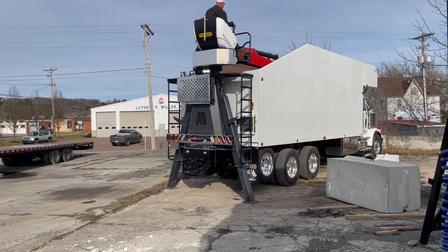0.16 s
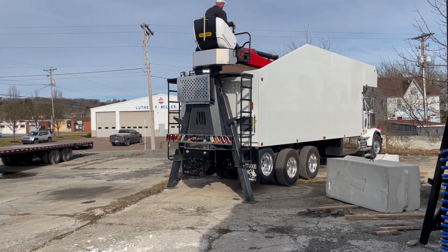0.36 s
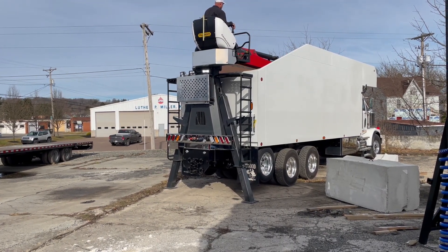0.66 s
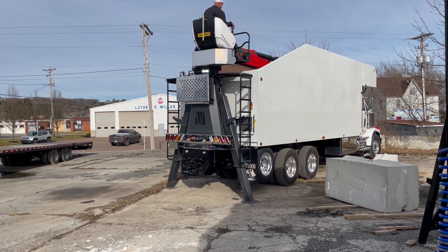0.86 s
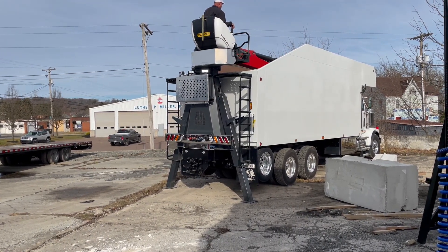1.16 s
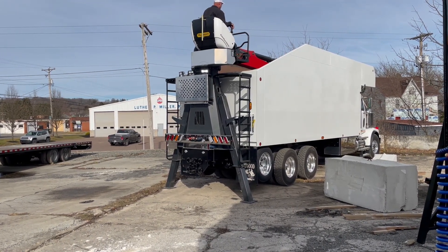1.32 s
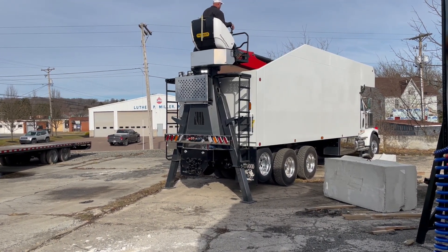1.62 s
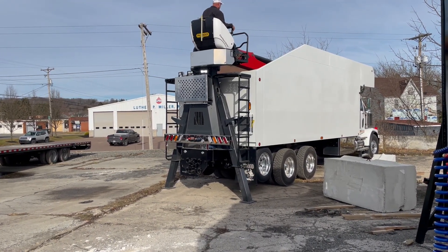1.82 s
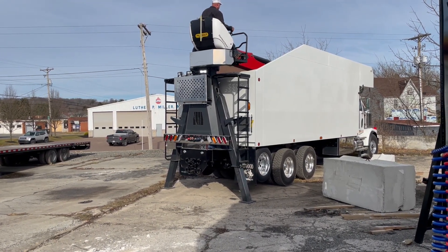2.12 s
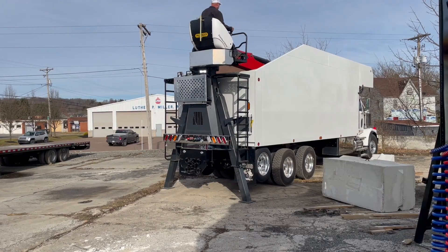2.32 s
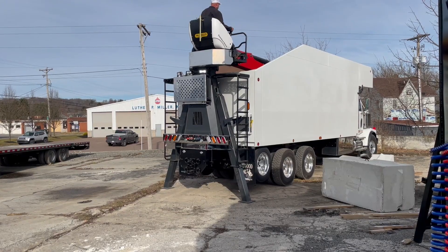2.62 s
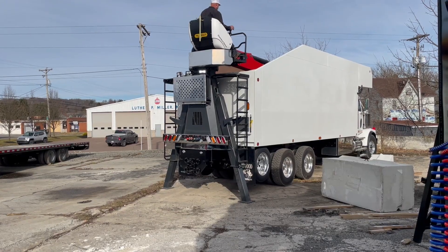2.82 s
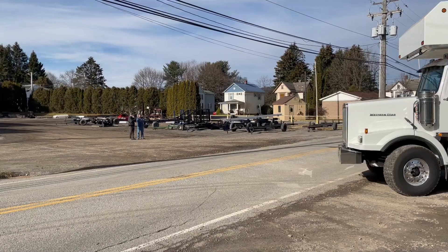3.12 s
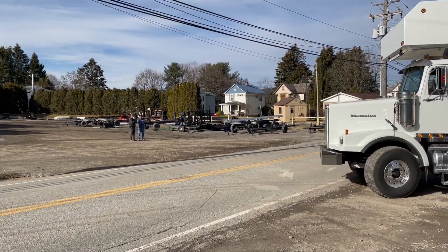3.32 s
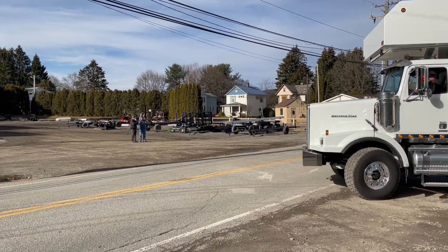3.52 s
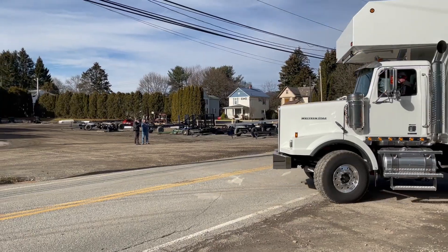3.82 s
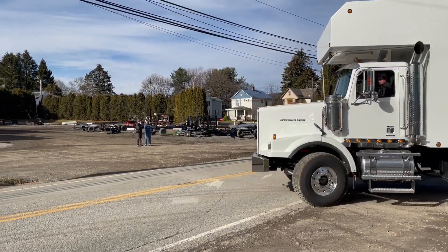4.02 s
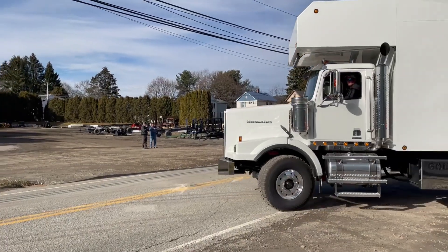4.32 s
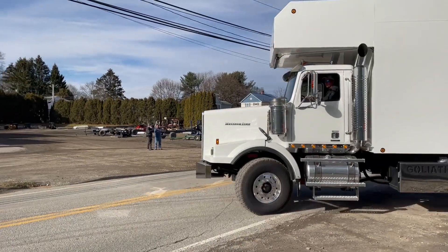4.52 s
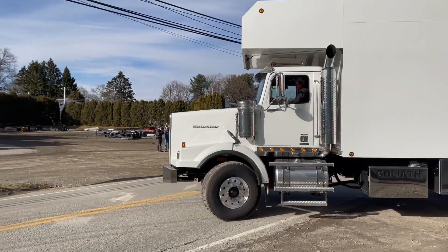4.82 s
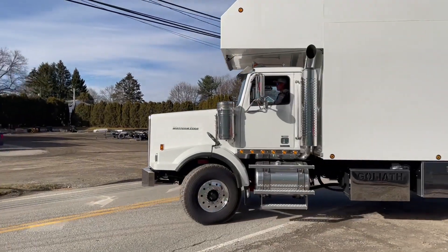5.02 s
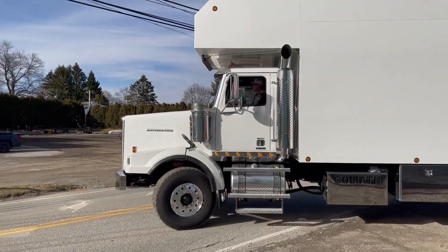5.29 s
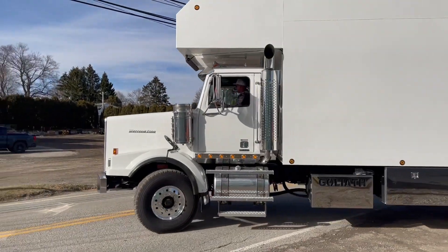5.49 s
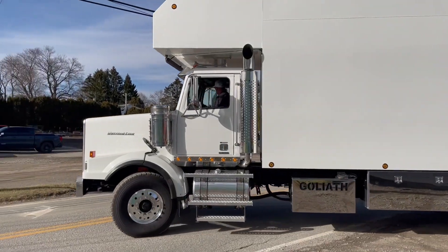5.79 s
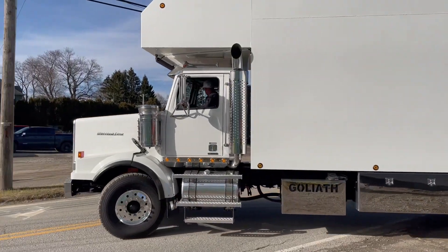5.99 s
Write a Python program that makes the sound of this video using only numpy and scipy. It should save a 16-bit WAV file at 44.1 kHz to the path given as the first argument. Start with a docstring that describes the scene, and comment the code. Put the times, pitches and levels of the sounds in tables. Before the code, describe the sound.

A diesel truck throbs at fast idle in a windy yard with pump whine, then abruptly another close view: it pulls away, shifts gear, turbo whistling.

```python
"""A six-cylinder diesel truck holds a fast idle in a windy yard, firings throbbing over a droning drive;
its crane pump whines at piston rate, oil hisses through a ringing valve, gusts of noise thump the microphone.
After a sudden cut the truck pulls out close by: brakes vent noise, revs climb under load, the turbo whistles.
At a gear change the throttle shuts, the revs drop and spare boost squeals out; then the truck pulls again.
Tones follow the firing and turbo rates; knocks and air are filtered noise, partly repeating by cylinder."""
import sys
import numpy as np
from scipy import signal
from scipy.fft import rfft, irfft
from scipy.io import wavfile
from scipy.ndimage import uniform_filter1d, map_coordinates

SR = 44100
rng = np.random.default_rng(int(sys.argv[2]) if len(sys.argv) > 2 else 0)


def dump_mix(stems):
    """Bounce the given channels to the path in sys.argv[1] as a 16-bit WAV at rate SR."""
    frames = np.atleast_2d(stems).T  # one column per channel
    limited = np.clip(frames, -1, 1)  # hard clip at full scale
    pcm = np.round(limited * 32767).astype(np.int16)
    wavfile.write(sys.argv[1], SR, pcm)


N = 271215
T = np.arange(N) / SR
FREQS = np.maximum(np.fft.rfftfreq(N, 1 / SR), 1)

YARD_END_S, ROAD_START_S = 3.081, 3.105
IDLE_HZ = 56.16  # firing rate at fast idle

# balance of opposite-phase to shared sound in the yard: (frequency [Hz], opposite minus shared [dB])
YARD_OPPOSITE = [(60, -13), (300, -3.5), (700, -7.5), (1300, -17.5), (2400, -4.5), (4800, -15),
                 (7800, 26.5), (10700, -23), (14000, 11)]
# balance of opposite-phase to shared sound on the road: (frequency [Hz], opposite minus shared [dB])
ROAD_OPPOSITE = [(60, -26), (250, -17), (500, -6.5), (1200, -10), (2500, -4.5), (5000, -9), (8400, 19),
                 (11000, -15.5)]
# revs driving off: (time [s], firing rate [Hz])
REVS = [(3.1, 69.37), (3.5, 80.07), (3.9, 87.21), (4.2, 90.33), (4.54, 91.3), (5.0, 74.98), (5.4, 64.06),
        (5.73, 59.38), (5.87, 62.67), (6.15, 65.14)]
# pulls on the throttle:
# (opens [s], shuts [s], throttle [0-1], throb before the muffler [dB], added combustion knock [dB])
PULLS = [(3.0, 4.51, 0.9, -11.5, 3.5), (5.737, 6.3, 0.21, -12, 5.5)]


def undb(db):
    """Decibels to gain."""
    return 10 ** (np.asarray(db) / 20)


def curves(table):
    """The columns of a table of timed rows, one value per sample."""
    s, *columns = np.transpose(table)
    return [np.interp(T, s, c) for c in columns]


def noise():
    """White noise of unit power."""
    return rng.standard_normal(N)


def walk(rate_hz):
    """Smooth random drift with a spread near 1."""
    k = int(SR / rate_hz)
    steps = np.repeat(rng.standard_normal(N // k + 1), k)
    return 1.3 * uniform_filter1d(uniform_filter1d(steps, k), k)[:N]


def after(start_s):
    """Seconds elapsed since a moment, zero before it."""
    return np.maximum(T - start_s, 0)


def gate(start_s, end_s, attack_s, release_s):
    """Envelope that rises from the start, holds at 1 and falls from the end."""
    rise = np.clip(after(start_s) / attack_s, 0, 1)
    return rise * np.clip(1 - after(end_s) / release_s, 0, 1)


def swell(centre_s, half_length_s):
    """A smooth rise and fall around a moment, 1 at its top."""
    return np.exp(-((T - centre_s) / half_length_s) ** 2 / 2)


def shape(points):
    """Gain at every frequency from (frequency [Hz], level [dB]) points."""
    hz, db = np.transpose(points)
    return undb(np.interp(np.log(FREQS), np.log(hz), db))


def bell(hz, centre_hz, width_hz):
    """Gain of one resonance, 1 at its centre."""
    return 1 / (1 + (2 * (hz - centre_hz) / width_hz) ** 2)


def lift(hz, modes):
    """Gain of a path that favours a few resonances."""
    return 1 + sum((undb(db) - 1) * bell(hz, f, w) for f, w, db in modes)


def filtered(x, gain):
    """Apply a gain at every frequency."""
    return irfft(rfft(x) * gain, N)


def colour(x, gain, band_hz=(0, SR)):
    """Filter white sound so that it has unit power inside the band."""
    inside = (FREQS >= band_hz[0]) & (FREQS <= band_hz[1])
    return filtered(x, gain / np.sqrt(np.mean(gain ** 2 * inside)))


def two_channels(source, balance):
    """Shared sound plus sound of opposite sign in the two channels, at constant power."""
    ratio = shape(balance)
    shared = 1 / np.sqrt(1 + ratio ** 2)
    signs = np.array([[1], [-1]])
    return filtered(source(), shared) + filtered(source(), ratio * shared) * signs


def count_cycles(hz):
    """Cycles elapsed at a moving rate."""
    return np.cumsum(hz) / SR


def tone(cycles):
    """A sine of unit power with a random start."""
    return np.sqrt(2) * np.sin(2 * np.pi * (cycles + rng.random()))


def breathy_tone(cycles, width_hz):
    """A whistle smeared by turbulence into a narrow moving band of unit power."""
    smear = bell(FREQS, 0, width_hz)
    angle = 2 * np.pi * cycles
    return colour(noise(), smear) * np.cos(angle) + colour(noise(), smear) * np.sin(angle)


def clatter(firings, repeat, knock, decay_s, uneven_db):
    """Six cylinders knock in turn, each with its own grain; part of each knock is fresh noise."""
    number = firings.astype(int)
    since = np.arange(N) - np.searchsorted(number, number)  # samples since the firing
    cylinder = number % 6
    voices = rng.standard_normal((6, 2048))
    repeat = np.clip(repeat, 0, 1)
    own = voices[cylinder, since % voices.shape[1]]
    grain = np.sqrt(repeat) * own + np.sqrt(1 - repeat) * noise()
    force = undb(uneven_db * rng.standard_normal(N)[number])
    x = grain * (1 + knock * force * np.exp(-since / SR / decay_s))
    return x / x.std()


def bass_swell():
    """Gain of the yard's low sounds, which start soft and soon reach full level."""
    start_db, settle_s = -15, 0.19
    return undb(start_db * np.exp(-T / settle_s))


def wind():
    """Light eddies flutter on each port alone; larger gusts thump both together, each duller or brighter."""
    # wind pressure spectrum: (frequency [Hz], relative density [dB per Hz])
    wind_spectrum = [(20, -17), (45, -11), (80, 5), (130, -3.5), (250, -5.5), (330, -17), (450, -22.5),
                     (1000, -31.5), (4000, -97)]
    # thumps: (time [s], level [dB], lowered by 4 dB for all thumps, half length [s], tilt [dB per octave])
    buffets = [(0.251, -14, 0.022, -3.5), (0.395, -14, 0.023, -4.5), (0.567, -10.5, 0.021, -2.5),
               (0.945, -9.5, 0.0084, -4), (1.06, -5.5, 0.019, -7), (1.192, -11, 0.0097, -4.5),
               (1.265, -12, 0.021, 7), (1.477, -18.5, 0.1, -1.5), (1.958, -10.5, 0.032, 0),
               (2.032, -10.5, 0.03, -1), (2.144, -12.5, 0.042, -3), (2.31, -14, 0.035, -3.5)]
    tilt_top_hz = 230  # gusts differ in colour below this
    eddies = [colour(noise(), shape(wind_spectrum)) * undb(-28.5 + 1.4 * walk(19)) for _ in range(2)]
    out = np.array(eddies) * bass_swell()
    turbulence = noise()
    for s, db, half_length_s, tilt_db in buffets:
        tilt = undb(tilt_db * np.log2(np.minimum(FREQS, tilt_top_hz)))
        pressure = colour(turbulence, shape(wind_spectrum) * tilt)
        pressure /= np.sqrt(uniform_filter1d(pressure ** 2, size=1500))  # the gust alone sets the strength
        out = out + undb(db - 4.0) * swell(s, half_length_s) * pressure
    return out


def governor():
    """How far the governor has raised the idle (0-1), and the firing rate [Hz] that results."""
    start_s, end_s, ramp_s, rise_hz = 1.0, 2.3, .1, .5
    raised = gate(start_s, end_s, ramp_s, ramp_s)
    return raised, IDLE_HZ + rise_hz * raised


def hydraulics():
    """The pump's pistons whine under load; oil hisses through the valve until the lever closes it."""
    # piston harmonics: (multiple of the piston rate [1], level re pump [dB])
    pump_orders = [(1, 1), (3, 0.5), (7, -12)]
    # oil flow spectrum: (frequency [Hz], relative density [dB per Hz])
    oil_spectrum = [(1500, 5.5), (4400, -2), (10500, 0), (12000, -5.5), (15700, -1)]
    # oil valve resonances: (frequency [Hz], width [Hz], lift [dB])
    valve_modes = [(4930, 230, 6.5), (6310, 240, 16), (8780, 240, 8), (10070, 150, 2)]
    # the pump labours at first, then speeds up and quietens as its load eases
    labouring_hz, labouring_db, eases_s = 694, -42, .76
    rise_hz, rise_s, drop_db, drop_s = 9, 0.095, 9, 0.22
    oil_db, valve_closes_s, fade_db_per_s = -44.5, 1.83, 13
    eased_s = after(eases_s)
    hz = labouring_hz + rise_hz * (1 - np.exp(-eased_s / rise_s))
    pump_db = labouring_db - drop_db * (1 - np.exp(-eased_s / drop_s))
    strokes = count_cycles(hz * (1 + 0.0011 * walk(25.24)))
    whine = sum(tone(k * strokes) * undb(pump_db + db + 1.3 * walk(18.2)) for k, db in pump_orders)
    # the engine drives the pump, so part of the hiss repeats with the firings
    firings = count_cycles(governor()[1])
    flow = two_channels(lambda: clatter(firings, repeat=0.1, knock=0.095, decay_s=0.0078, uneven_db=8.5),
                        YARD_OPPOSITE)
    hiss = colour(flow, shape(oil_spectrum) * lift(FREQS, valve_modes), (8500, 13000))
    return whine + hiss * undb(oil_db - fade_db_per_s * after(valve_closes_s))


def idling_engine():
    """Governed diesel heard from behind: exhaust strokes, a droning accessory drive, dull clatter."""
    # exhaust lines: (multiple of the firing rate [1])
    line_orders = [3, 5, 6, 9, 10]
    # their mean levels: (level [dB])
    line_levels_db = [-45.5, -46.5, -49.5, -55, -47.5]
    # accessory drive whirr: (multiple of the drive rate [1])
    drive_orders = [4, 5, 6, 7, 8, 10, 11, 14]
    # their mean levels: (level [dB])
    drive_levels_db = [-49.5, -49, -45.5, -43.5, -55, -46, -49, -53.5]
    # clatter through the block: (frequency [Hz], relative density [dB per Hz])
    block_spectrum = [(30, -17), (60, 16.5), (150, 10.5), (330, -2), (500, 2), (750, 2), (1000, -1),
                      (1500, -2.5), (2000, -6.5), (3000, -14), (4500, -19), (8000, -26), (12000, -48),
                      (15000, -50)]
    drive_hz = 108.84  # at IDLE_HZ; turns with the engine
    full_throb_db, hum_db, full_drone_db, clatter_db = -22.5, -26, -28.5, -32.5
    full_s, swell_db_per_s = 1.07, 37  # the throb swells as the crane takes the weight
    dip_s, dip_half_s, dip_db = 2.385, 0.016, -14  # the throb dips briefly
    drone_dip_db = -6  # the drone sinks while the governor runs faster
    raised, hz = governor()
    firings = count_cycles(hz * (1 + 0.002933 * walk(12)))
    throb_db = full_throb_db - swell_db_per_s * np.maximum(full_s - T, 0) + dip_db * swell(dip_s, dip_half_s)
    stroke = 2 * np.pi * firings  # throb and hum crest together on every firing
    throb = np.sqrt(2) * np.cos(stroke) * undb(throb_db + 1.5 * walk(18))
    hum = np.sqrt(2) * np.cos(2 * stroke) * undb(hum_db + .8 * walk(6))
    lines = sum(tone(k * firings) * undb(db + 3.86 * walk(6.98))
                for k, db in zip(line_orders, line_levels_db))
    turns = firings * drive_hz / IDLE_HZ
    drone = tone(2 * turns) * undb(full_drone_db + drone_dip_db * raised + .7 * walk(9))
    whirr = sum(tone(k * turns) * undb(db + 3.5 * walk(7.09))
                for k, db in zip(drive_orders, drive_levels_db))
    knocks = two_channels(lambda: clatter(firings, repeat=0.37, knock=0.28, decay_s=0.0023, uneven_db=8.0),
                          YARD_OPPOSITE)
    block = colour(knocks, shape(block_spectrum), (500, 2500)) * undb(clatter_db)
    return throb + (hum + drone + lines) * bass_swell() + whirr + block


def air_brake():
    """The released brakes vent a sputtering hiss through a ringing valve; it holds briefly and dies away."""
    # vented air: (frequency [Hz], relative density [dB per Hz])
    brake_spectrum = [(1500, -15), (3200, 2.5), (5500, 4), (6200, -2.5), (9000, -3.5), (12000, -9),
                      (15000, -42)]
    # brake valve resonances: (frequency [Hz], width [Hz], lift [dB])
    brake_modes = [(2350, 76, 17), (3270, 100, 10.6), (3620, 220, 9), (5400, 250, 7)]
    level_db, sputter_db, empty_s, decay_s = -27, 3, 3.2, 0.19
    jet = colour(two_channels(noise, ROAD_OPPOSITE), shape(brake_spectrum) * lift(FREQS, brake_modes))
    return jet * undb(level_db + sputter_db * walk(130)) * np.exp(-after(empty_s) / decay_s)


def blow_off(turns):
    """Between the pulls spare boost sputters out, rings the duct, squeals, brings out the whistle's octave."""
    # air duct modes: (settled frequency [Hz], width [Hz], level before the fade [dB])
    duct_modes = [(2510, 46, -40.5), (2800, 47.8, -41.5), (3020, 76, -41), (4006, 170, -34),
                  (4360, 310, -37), (6100, 160, -42), (8400, 6600, -40), (11100, 3300, -44.5)]
    # squeal level before sputter: (time [s], level [dB])
    squeal_level = [(4.52, -30), (4.63, -30), (4.76, -29.5), (4.87, -40), (5.01, -36.5), (5.15, -39.5),
                    (5.42, -37.5), (5.6, -32.5), (5.7, -40)]
    attack_s, release_s, fade_db_per_s = 0.11, 0.06, 3  # boost builds up, then its pressure drains
    sputter_top_hz = 5000  # duct modes below this sputter
    settled_hz, sharp_hz, squeal_waver_hz, squeal_width_hz = 2313, 186, 23.9, 78
    duct_sharp, settle_s = .06, .15  # duct and squeal start high and settle together
    octave_db, octave_peak_s, octave_half_s = -43, 4.88, .28
    shuts_s, reopens_s = PULLS[0][1], PULLS[1][0]
    drained_s = after(shuts_s)
    settling = np.exp(-drained_s / settle_s)
    waver = 1 + duct_sharp * settling + .008 * walk(20)
    sputter_db = 2.4 * walk(85)

    def duct():
        """Turbulence rings every mode of the duct."""
        return sum(breathy_tone(count_cycles(hz * waver), width_hz)
                   * undb(db + 1.5 * walk(60) + sputter_db * (hz < sputter_top_hz))
                   for hz, width_hz, db in duct_modes)

    hiss = two_channels(duct, ROAD_OPPOSITE) * undb(-fade_db_per_s * drained_s)
    octave = breathy_tone(2 * turns, width_hz=700) * undb(octave_db + 1.2 * walk(30))
    octave = octave * swell(octave_peak_s, octave_half_s)
    squeal_hz = settled_hz + sharp_hz * settling + squeal_waver_hz * walk(25)
    squeal = breathy_tone(count_cycles(squeal_hz), squeal_width_hz)
    squeal /= np.sqrt(uniform_filter1d(squeal ** 2, size=2200))  # the pressure alone sets the strength
    squeal *= undb(curves(squeal_level)[0] + sputter_db)
    return (hiss + octave + squeal) * gate(shuts_s, reopens_s, attack_s, release_s)


def turbo(firings, load, throttle):
    """Intake air pulses with the firings; the compressor whistles, breathy on throttle and purer off it."""
    # turbocharger speed: (time [s], whistle [Hz])
    turbo_speed = [(3.1, 5350), (3.35, 5300), (3.78, 5986), (4.15, 6860), (4.48, 7225), (4.65, 6620),
                   (4.9, 6015), (5.2, 5520), (5.58, 4884), (5.72, 4834), (5.8, 4661), (6.0, 4550),
                   (6.15, 4640)]
    # compressor inlet resonances the whistle sweeps through: (frequency [Hz], width [Hz], lift [dB])
    inlet_modes = [(4770, 280, 10.5), (5300, 120, 4), (6140, 430, 9)]
    # intake air: (frequency [Hz], relative density [dB per Hz])
    air_spectrum = [(2000, 3), (3400, 3), (4400, 2), (5400, 3), (6600, 3), (9200, -7), (11800, -8.5),
                    (13000, -14), (15000, -30)]
    # intake resonances: (frequency [Hz], width [Hz], lift [dB])
    intake_modes = [(4380, 180, 7.5), (5200, 200, -1), (6560, 520, 6.5)]
    # air surges: (time [s], level before attack and decay [dB], decay [s])
    air_surges = [(3.43, -31.5, 0.1), (3.69, -31, 0.38), (4.52, -34.5, 0.45)]
    whistle_db, whistle_load_db, pull_width_hz, coast_width_hz = -48.5, 6.5, 750, 250
    air_db, air_throttle_db, surge_attack_s = -37.5, 4, 0.022
    dip_s, dip_half_s, dip_db = 4.41, 0.074, -3  # whistle and rush sink just before the gear change
    hz = curves(turbo_speed)[0]
    turns = count_cycles(hz + 35 * walk(35))
    flutter_db = 1.5 * np.cos(2 * np.pi * firings) + 1.8 * walk(60)  # every exhaust pulse kicks the turbine
    breathy = np.sqrt(throttle) * breathy_tone(turns, pull_width_hz)
    purer = np.sqrt(1 - throttle) * breathy_tone(turns, coast_width_hz)
    whistle_gain = undb(whistle_db + whistle_load_db * load + flutter_db)
    whistle = (breathy + purer) * lift(hz, inlet_modes) * whistle_gain
    surges = [undb(db) * np.minimum(after(s) / surge_attack_s, 1) * np.exp(-after(s) / decay_s)
              for s, db, decay_s in air_surges]
    rush = np.sqrt(undb(air_db + air_throttle_db * throttle) ** 2 + np.sum(np.square(surges), axis=0))
    puffs = two_channels(lambda: clatter(firings, repeat=0.6, knock=0.84, decay_s=0.0076, uneven_db=-0.5),
                         ROAD_OPPOSITE)
    air = colour(puffs, shape(air_spectrum) * lift(FREQS, intake_modes), (4900, 7200))
    air = air * rush * undb(1.23 * walk(15))
    dip = undb(dip_db * swell(dip_s, dip_half_s))
    muffle = shape([(13000, 0), (15000, -15)])
    return filtered((whistle + air) * dip + blow_off(turns), muffle)


def chirps(firings):
    """Each firing draws a short chirp from the block: one cylinder leads, others join as the revs rise."""
    # chirp of each cylinder before evening and scatter: (level [dB])
    cylinder_db = np.array([2, -14, -10, -13, -9, -13])
    ring_hz, waver_hz, level_db, scatter_db = 1750, 35, 0.5, 2.5
    evens_hz, evening = 83, .5  # above this firing rate the cylinders even out, by this share
    count_start_s = 3.152
    count = firings - np.interp(count_start_s, T, firings) + .5
    number = np.floor(count).astype(int)
    joined = evening / (1 + np.exp((evens_hz - curves(REVS)[0]) / 2))
    db = cylinder_db[number % len(cylinder_db)] * (1 - joined) + scatter_db * noise()[number]
    pulse = np.abs(np.sin(np.pi * count))
    chirp = tone(count_cycles(ring_hz + waver_hz * noise()[number]))
    return chirp * pulse * undb(level_db + db)


def engine_block(firings, throttle):
    """Hard combustion knock and chirps under load, lighter gear and valve rattle off throttle."""
    # block under load: (frequency [Hz], relative density [dB per Hz])
    pull_spectrum = [(25, -26), (55, 9), (120, 5.5), (170, -1), (270, 10), (400, 3), (520, 5.5), (780, 1),
                     (900, -0.5), (1300, 1.5), (1750, -1), (2000, -4.5), (3000, -11.5), (5000, -57)]
    # block off throttle: (frequency [Hz], relative density [dB per Hz])
    coast_spectrum = [(25, -20), (60, 13.5), (120, 10), (165, 7), (220, 8.5), (340, 10.5), (440, 2.5),
                      (580, 4.5), (800, -1.5), (1750, -1.5), (1950, -5.5), (3000, -11), (5000, -38)]
    ring_hz, ring_width_hz, ring_db = 1750, 50, -18  # faint, all the time
    knocks = two_channels(lambda: clatter(firings, repeat=0.65, knock=0.78, decay_s=0.0013, uneven_db=5.0),
                          ROAD_OPPOSITE)
    pull = colour(knocks, shape(pull_spectrum), (600, 1900))
    coast = colour(knocks, shape(coast_spectrum), (600, 1900))
    ring = colour(knocks, bell(FREQS, ring_hz, ring_width_hz)) * undb(ring_db)
    return throttle * (pull + chirps(firings)) + (1 - throttle) * coast + ring


def roll_past(x):
    """The engine reaches the right port first, then the left, and sounds thinner from the side."""
    # colour change once the side of the engine bay is in view: (frequency [Hz], gain [dB])
    side_on = [(100, 3), (250, -5.5), (450, -7.5), (750, 4), (1200, -1.5), (1800, -1.5)]
    abreast_s, passing_s, port_lag_s, pan_db = 4.74, 1, 0.000091, 2
    side = np.tanh((T - abreast_s) / passing_s)  # -1 right, 1 left
    x = x + (1 + side) / 2 * (filtered(x, shape(side_on)) - x)
    ports = []
    for port, sign in zip(x, (1, -1)):
        heard_at = (T + sign * side * port_lag_s / 2) * SR
        delayed = map_coordinates(port, [heard_at], mode="mirror")
        ports.append(delayed * undb(sign * side * pan_db / 2))
    return np.array(ports)


def exhaust(firings, hz, load, pull_gain):
    """Firing throb, boom and roar of the stack, weaker harmonics gliding through the pipe's resonances."""
    # muffler transmission of the throb: (firing rate [Hz], gain [dB])
    muffler = [(55, -14), (64, -1.5), (70, 1.5), (77, -1), (82.5, -6.5), (89, -2.5), (92, -6.5)]
    # exhaust pipe resonances: (frequency [Hz], width [Hz], lift [dB])
    stack_modes = [(296, 17, 12), (341, 26, 11.5), (468.5, 23, 18)]
    # other exhaust lines: (multiple of the firing rate [1])
    growl_orders = [1 / 2, 2, 4, 5, 6]
    # their levels at top revs before pipe lift: (level re unmuffled throb [dB])
    growl_levels_db = [-28, -29.5, -26, -34, -29]
    # the stack booms as the third harmonic climbs into it
    boom_hz, boom_width_hz, boom_db, coast_boom_db = 271.2, 29, -15, -28.5
    coast_throb_db = -45  # before the muffler
    roar_db, growl_db_per_octave = -31.5, 8  # growl and roar harden with the revs
    strength = pull_gain + (1 - load) * undb(coast_throb_db)
    muffled = strength * undb(np.interp(hz, *np.transpose(muffler)))
    throb = tone(firings) * muffled * undb(1.1 * walk(28))
    boom_gain = (load * undb(boom_db) + (1 - load) * undb(coast_boom_db)) * undb(0.96 * walk(13))
    boom = tone(3 * firings) * boom_gain * bell(3 * hz, boom_hz, boom_width_hz)
    growl = sum(tone(k * firings + .04 * walk(40)) * lift(k * hz, stack_modes)
                * undb(db + 2.2 * walk(25.05))
                for k, db in zip(growl_orders, growl_levels_db))
    # rushing gas rings the stack under load
    ringing = sum(undb(db) * bell(FREQS, f, w) for f, w, db in stack_modes)
    roar = colour(noise(), ringing) * load * undb(roar_db)
    hardening = undb(growl_db_per_octave * np.log2(hz / hz.max()))
    return throb + boom + (roar + growl * strength) * hardening


def pedal():
    """The pulls over time: under load (0-1), throttle (0-1), gain of the throb, added knock [dB]."""
    open_ramp_s, shut_ramp_s = 0.062, 0.028
    opens, shuts, throttle, throb_db, knock_db = np.transpose(PULLS)
    held = np.array([gate(a, b, open_ramp_s, shut_ramp_s) for a, b in zip(opens, shuts)])
    return held.sum(axis=0), np.clip(throttle, 0, 1) @ held, undb(throb_db) @ held, knock_db @ held


def driving_truck():
    """The cab rolls past: the deep sounds lean right, the engine bay is heard more on the left."""
    # balance of the two ports: (frequency [Hz], left minus right [dB])
    road_balance = [(100, -1.54), (300, -2.5), (650, -2), (900, 2.5), (1200, 5.5), (1750, 2), (2500, 4.5),
                    (4200, 1.5), (5500, 0), (8000, -0.5)]
    idle_clatter_db, clatter_db_per_octave = -30.5, 6  # off throttle at IDLE_HZ; louder with the revs
    # the crankshaft shakes the frame twice a turn
    frame_hz, frame_width_hz, frame_db = 56.4, 7, -27
    hz = curves(REVS)[0]
    load, throttle, pull_gain, knock_db = pedal()
    firings = count_cycles(hz * (1 + .002 * walk(25)))
    clatter_db = idle_clatter_db + clatter_db_per_octave * np.log2(hz / IDLE_HZ) + knock_db
    block = roll_past(engine_block(firings, throttle) * undb(clatter_db))
    bay = block + turbo(firings, load, throttle) + air_brake()
    shake = tone(2 / 3 * firings) * bell(2 / 3 * hz, frame_hz, frame_width_hz) * undb(frame_db)
    tilt = np.sqrt(shape(road_balance))
    return filtered(bay + exhaust(firings, hz, load, pull_gain) + shake, np.array([tilt, 1 / tilt]))


def scene():
    """The yard, an instant of silence, then the road."""
    yard = wind() + hydraulics() + idling_engine()
    return yard * (T < YARD_END_S) + driving_truck() * (T >= ROAD_START_S)


def record(dry):
    """The microphone path sheds the deepest rumble and cuts the top."""
    rumble_hz, top_hz = 30, 15750
    thinned = signal.sosfilt(signal.butter(2, rumble_hz, "high", fs=SR, output="sos"), dry)
    return signal.sosfilt(signal.ellip(8, .2, 80, top_hz, fs=SR, output="sos"), thinned)


dry = scene()
out = record(dry)
dump_mix(out)
```